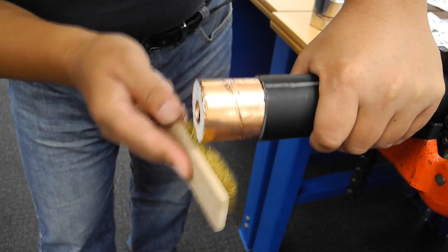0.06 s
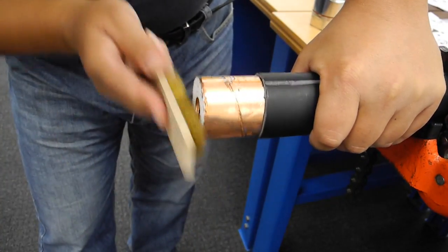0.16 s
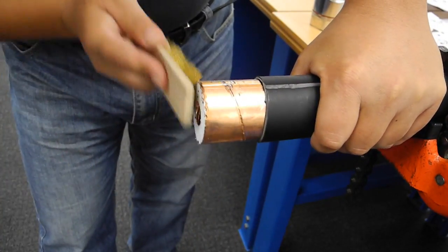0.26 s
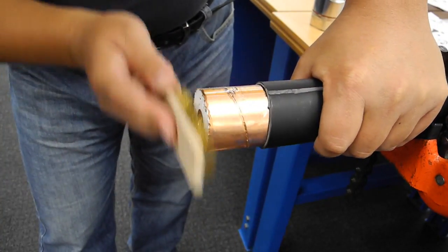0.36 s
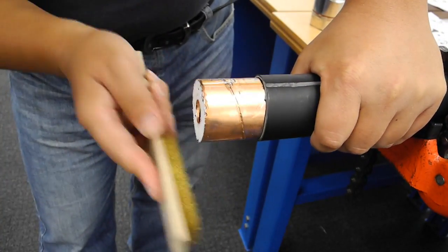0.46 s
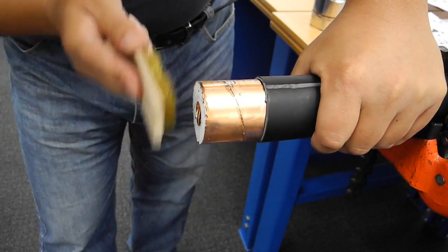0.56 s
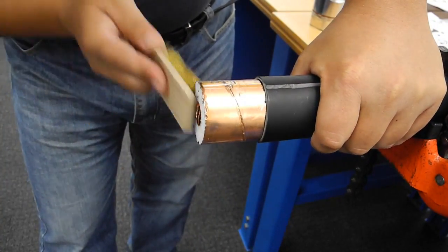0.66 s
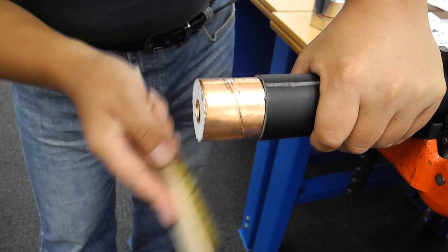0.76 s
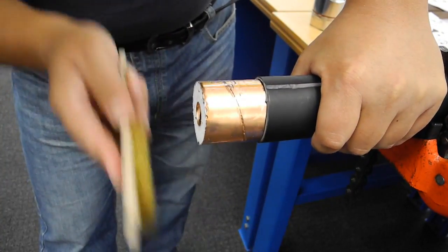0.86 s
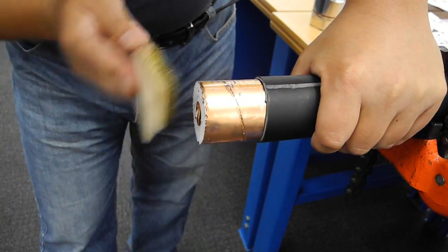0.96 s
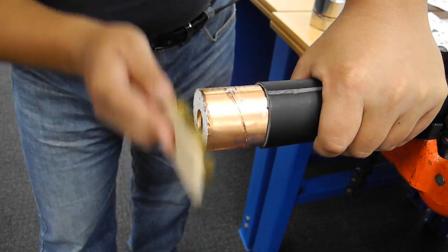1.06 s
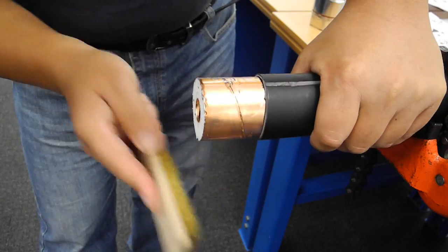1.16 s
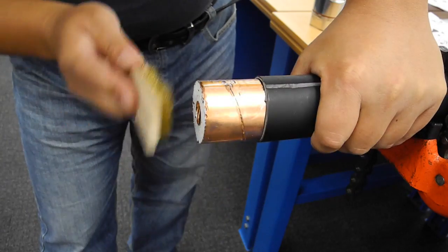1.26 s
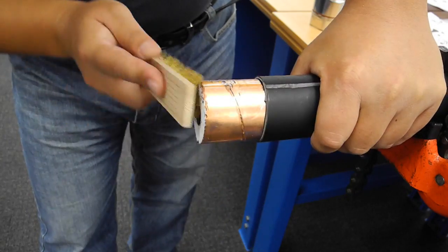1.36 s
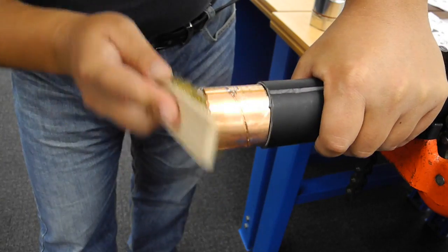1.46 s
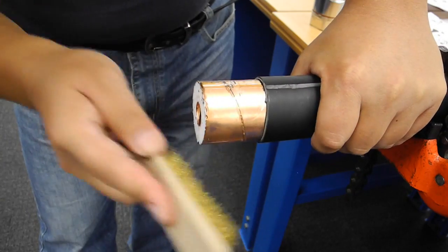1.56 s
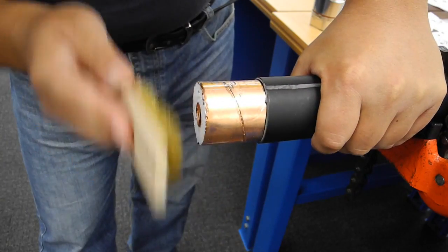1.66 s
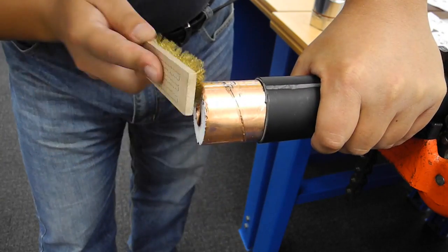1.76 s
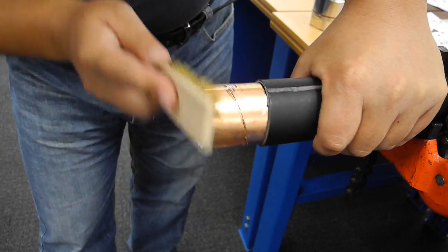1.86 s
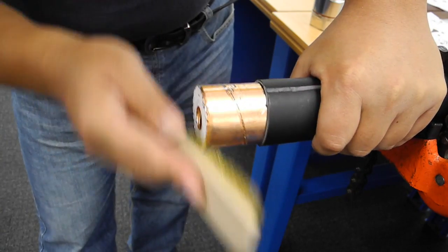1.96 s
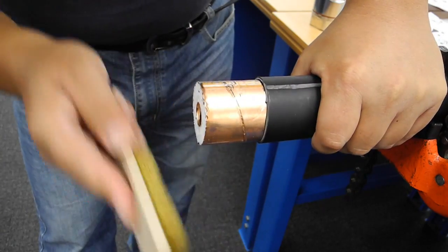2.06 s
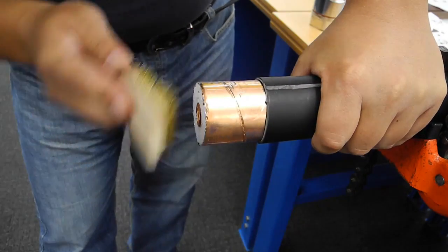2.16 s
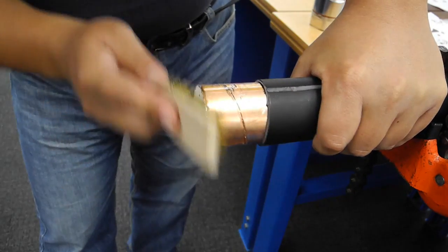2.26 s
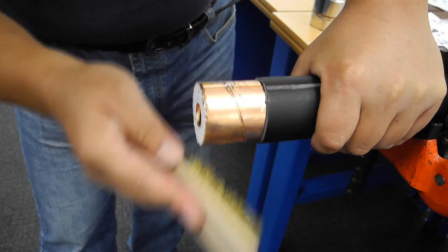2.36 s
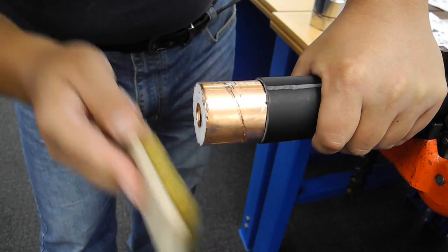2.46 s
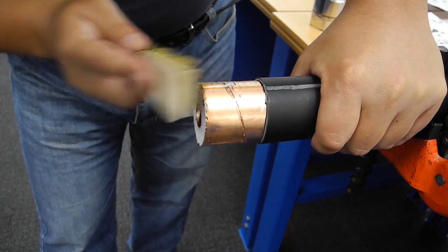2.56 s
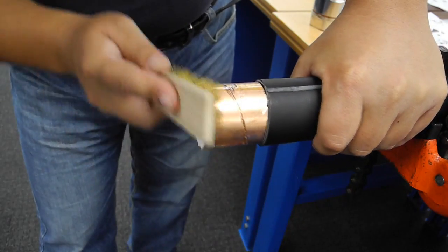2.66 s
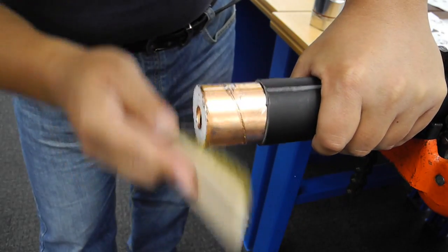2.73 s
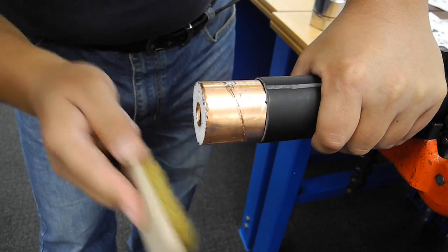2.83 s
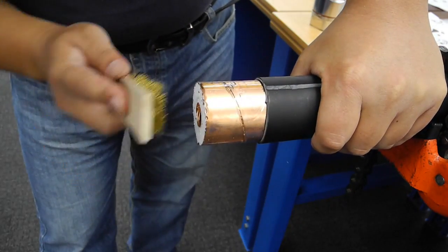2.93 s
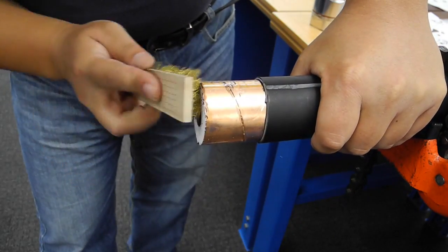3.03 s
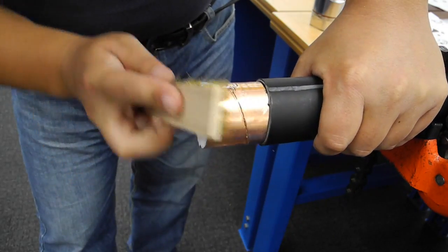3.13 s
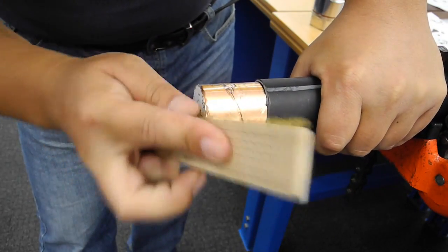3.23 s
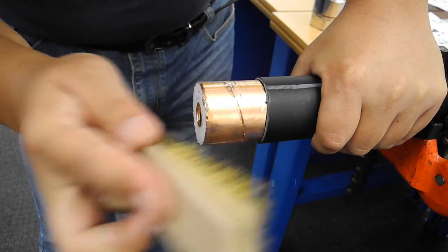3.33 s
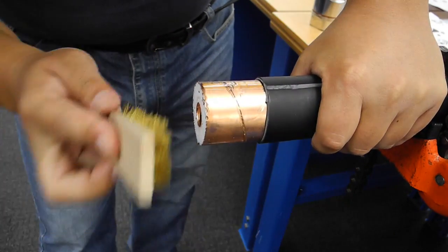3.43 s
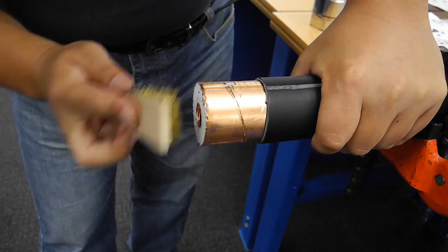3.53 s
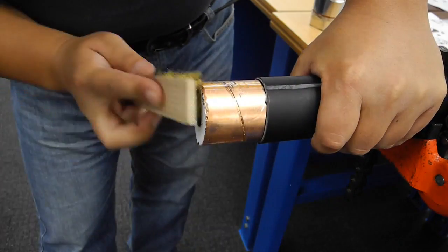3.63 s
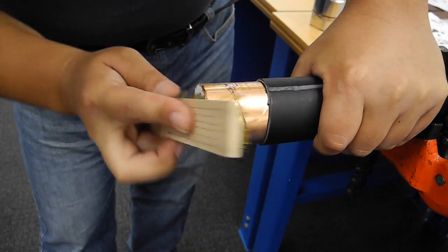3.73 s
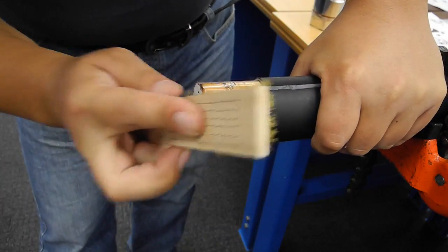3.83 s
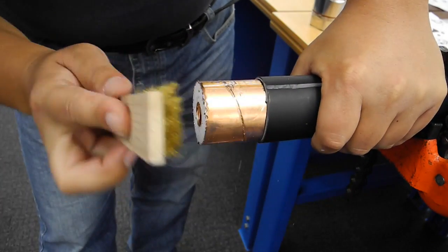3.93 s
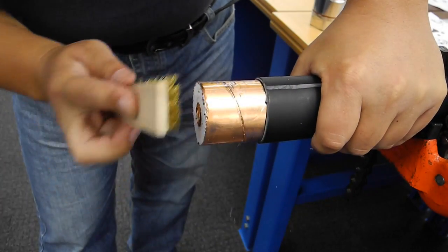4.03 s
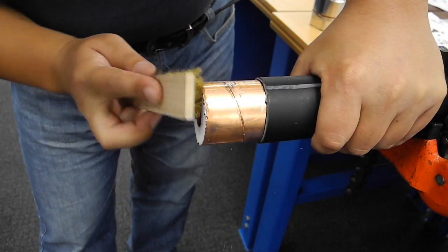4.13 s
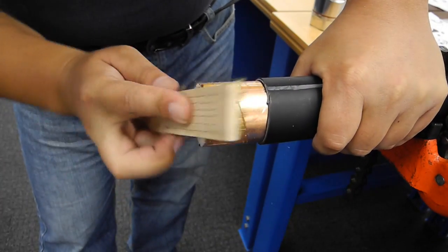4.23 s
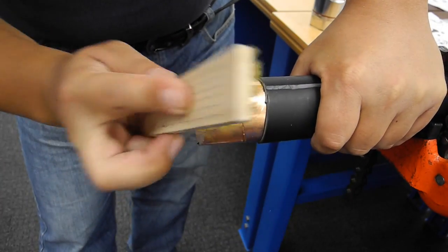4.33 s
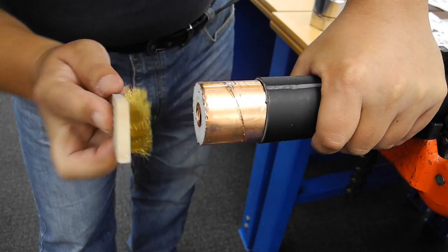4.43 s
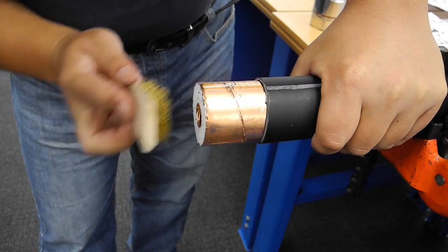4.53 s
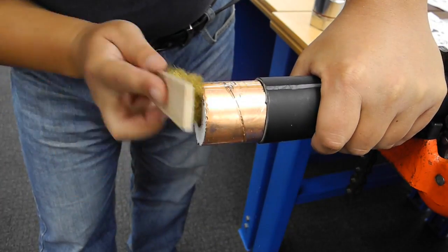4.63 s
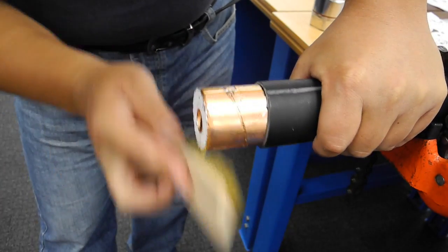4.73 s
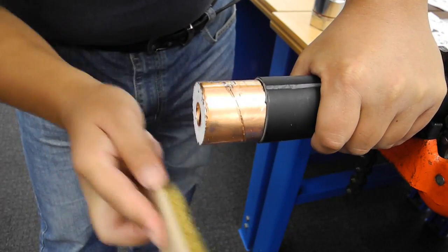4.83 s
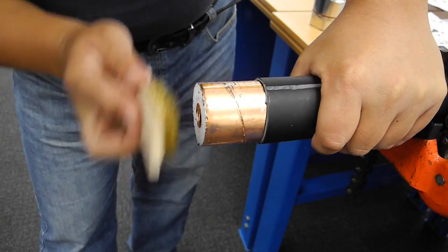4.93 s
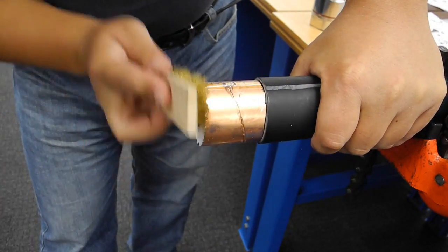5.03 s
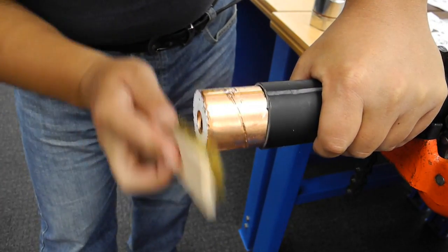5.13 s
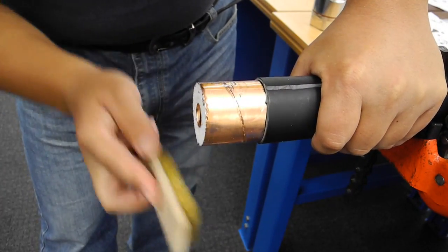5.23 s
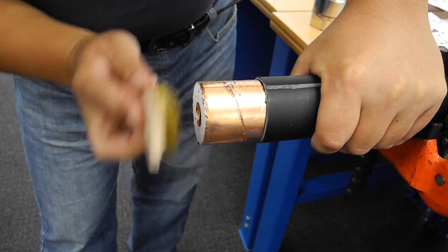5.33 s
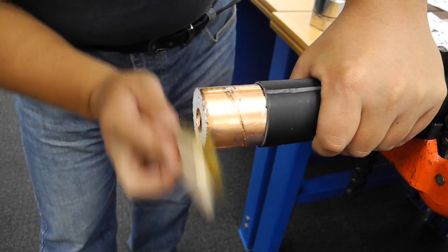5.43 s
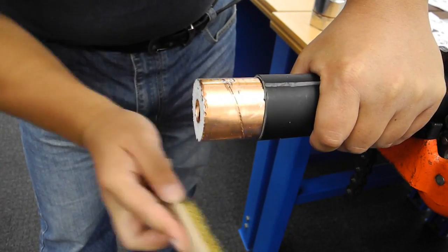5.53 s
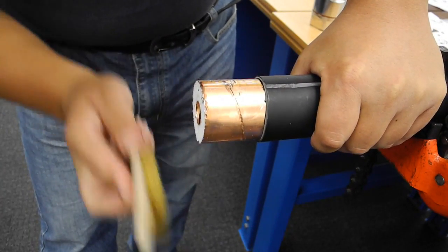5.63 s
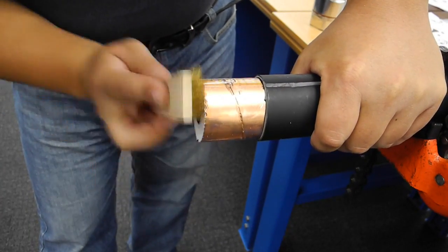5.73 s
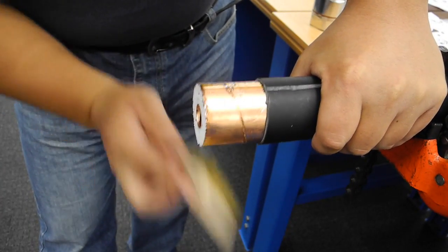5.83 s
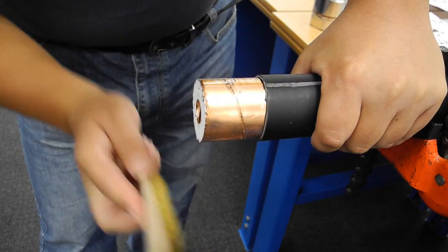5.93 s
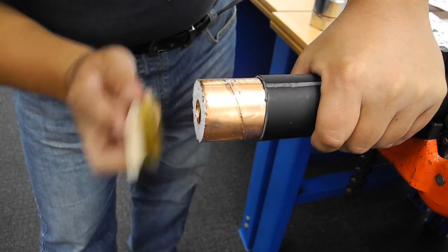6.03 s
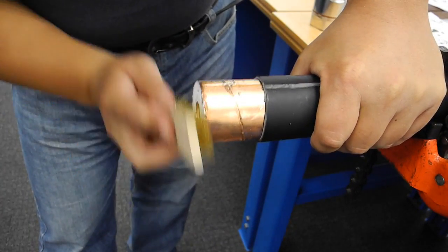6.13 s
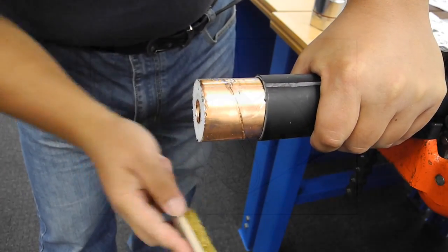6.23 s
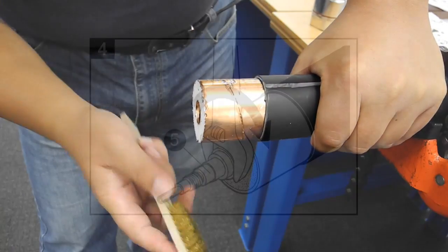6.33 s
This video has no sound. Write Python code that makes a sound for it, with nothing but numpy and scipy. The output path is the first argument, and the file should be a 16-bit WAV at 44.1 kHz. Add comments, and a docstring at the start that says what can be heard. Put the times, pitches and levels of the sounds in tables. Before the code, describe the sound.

Dry, scratchy wire bristles brush over copper in short repeated strokes, each a crisp tick followed by a hissing scrape with a slight metallic ring. The rhythm is quick and a little uneven, with longer rubs in the middle and firmer, shorter hits with soft low cable knocks near the end. Heard very close in stereo, with a short diffuse room tail and a quiet, steady low ventilation drone.

```python
"""A brass wire brush swipes the cut copper end of a thick cable, heard close up and in stereo in a workshop.
Random slips of the bristle tips ring filters for the bristles, the copper sheath and the cable in the hand.
Strokes swell, drag to the edge and lift off; landings, bounces and ticks add short crunches and knocks.
The room answers with a short diffuse tail of decaying noise.
Filtered noise and a sine make a low ventilation rumble, two drones, a motor hum and a faint hiss."""
import sys
import numpy as np
from scipy import signal
from scipy.fft import rfft, irfft
from scipy.io import wavfile
from scipy.ndimage import uniform_filter1d

SR = 44100
rng = np.random.default_rng(int(sys.argv[2]) if len(sys.argv) > 2 else 0)


def log_audio(samples):
    """Write samples as a 16-bit WAV file to the path given in sys.argv[1]."""
    # one column per channel
    frames = np.atleast_2d(samples).T
    # limit to full scale, then quantise
    limited = np.clip(frames, -1, 1)
    pcm = np.round(limited * 32767).astype(np.int16)
    wavfile.write(sys.argv[1], SR, pcm)


N = 281793  # length in samples


def undb(db):
    """Turn decibels into an amplitude factor."""
    return 10 ** (np.asarray(db) / 20)


def unit(x):
    """Scale to rms 1."""
    return x / np.sqrt(np.mean(x ** 2))


def rms_gain(response):
    """Root mean square gain over all frequency bins."""
    return np.sqrt(np.mean(abs(response) ** 2))


def bins():
    """Frequency of every bin in Hz."""
    return np.fft.rfftfreq(N, 1 / SR)


def along(table):
    """Read a curve of frequency points at every bin, on a log frequency scale."""
    hz, value = np.transpose(table)
    return np.interp(np.log(bins() + 1), np.log(hz), value)


def shape(x, gain):
    """Filter by a gain for every frequency bin."""
    return irfft(rfft(x) * gain, N)


def resonances(table):
    """Response of a sum of damped modes, each a row of pitch_hz, width_hz, level_db."""
    f = bins()
    response = 0
    for hz, width, db in table:
        damping = 1j * f * width
        response = response + undb(db) * damping / (hz ** 2 - f ** 2 + damping)
    return response


def ports(common, left, right, likeness):
    """Two channels from a shared and two private signals, mixed band by band."""
    shared = np.clip(along(likeness), 0, 1)
    middle = shape(common, np.sqrt(shared))
    return np.array([middle + shape(own, np.sqrt(1 - shared)) for own in (left, right)])


def walk(rate):
    """Random levels, new at this rate per second, slewed from one to the next; spread near 1."""
    hold = int(SR / rate)
    return uniform_filter1d(np.repeat(rng.standard_normal(N // 20), hold)[:N], hold)


SLIPS_PER_S, SLIP_SPREAD_DB = 9200, 2.5


def slips():
    """Bristle tips catch and let go at random moments, a few harder than the rest."""
    moment, force, way = rng.random((3, N))
    size_db = np.minimum(-SLIP_SPREAD_DB * np.log(1 - force), 9)
    size = undb(size_db) * np.sign(way - .5)
    happens = np.clip((SLIPS_PER_S / SR - moment) * 20, 0, 1)
    return unit(size * happens)


SWELL_BEND, LIFT_BEND = 1.64, 1.24  # the swell slows towards full level, the lift speeds up
LIFT_DB = -30.5  # change of scrape level by the end of the lift
# share of the level's drop that ring and hiss are spared (a negative share drops further)
RING_SWELL_KEEP, RING_LIFT_KEEP = 0.058, 0.18
HISS_SWELL_KEEP, HISS_LIFT_KEEP = 0.13, -.1
HISS_CLIMB_DB = 2  # the hiss brightens from full level to the edge
FADE_S = .005  # the tips come and go this quickly at both ends of a stroke
RUB_KNOCK_DB = -36  # cable shudder under the rub, relative to the scrape


def stroke(t, start, swell, drag, lift, touch_db, full_db, edge_db, ring_db, hiss_db):
    """Gains of scrape, ring, hiss and shudder as one swipe swells, drags to the edge and lifts off."""
    edge = start + swell + drag
    end = edge + lift
    unswelled = np.clip(1 - (t - start) / swell, 0, 1)
    dragged = np.clip((t - start - swell) / drag, 0, 1)
    lifted = np.clip((t - edge) / lift, 0, 1)
    lack_db = (full_db - touch_db) * unswelled ** SWELL_BEND
    gone_db = -LIFT_DB * lifted ** LIFT_BEND
    scrape_db = full_db + (edge_db - full_db) * dragged - lack_db - gone_db
    ring = ring_db + RING_SWELL_KEEP * lack_db + RING_LIFT_KEEP * gone_db
    hiss = hiss_db + HISS_CLIMB_DB * dragged
    hiss = hiss + HISS_SWELL_KEEP * lack_db + HISS_LIFT_KEEP * gone_db
    touch = np.interp(t, [start - FADE_S, start, end, end + FADE_S], [0, 1, 1, 0])
    return touch * undb(scrape_db + np.array([0 * t, ring, hiss, RUB_KNOCK_DB + 0 * t]))


# swipes of the brush, levels before the flicker; ring and hiss are relative to the scrape
# start_s, swell_s, drag_s, lift_s, touch_db, full_db, edge_db, ring_db, hiss_db
SWIPES = [ (-0.01, 0.026, .02, 0.016, -52, -49.5, -51, -11.5, 2.5),
          (0.035, 0.049, 0.033, .045, -56.5, -33, -37, -12, -3),
          (0.14, .055, 0.039, .035, -60, -36.5, -35, -11, -1.5),
          (0.315, 0.063, 0.077, 0.046, -54, -33.5, -29.5, -14.5, -3),
          (0.698, 0.066, 0.04, 0.025, -57.5, -33, -32.5, -14, -4),
          (1.05, .07, 0.036, 0.029, -51, -30.5, -29.5, -16, -3.5),
          (1.41, 0.12, 0.043, 0.043, -53, -31.5, -33, -12, -3.5),
          (1.824, 0.0092, .012, 0.018, -52, -44.5, -48, -13, -3),
          (1.862, 0.094, 0.054, 0.03, -52.5, -30.5, -31, -13, -4),
          (2.275, 0.071, .057, 0.031, -61, -31.5, -33, -15.5, -6),
          (2.658, 0.091, 0.046, 0.038, -53, -32, -32.5, -11.5, -4.5),
          (3.035, .015, .02, .015, -72, -68, -65, -4, -4),
          (3.078, 0.12, 0.099, .016, -57, -30.5, -35, -11, -5.5),
          (3.662, 0.091, 0.1, 0.036, -52, -32, -34, -11, -5.5),
          (4.172, 0.089, 0.077, 0.019, -54, -32, -36.5, -11.5, -4.5),
          (4.7, 0.078, 0.046, 0.051, -53.5, -32, -30.5, -12.5, -2.5),
          (5.104, 0.083, 0.027, 0.041, -48.5, -33.5, -29.5, -12.5, -2.5),
          (5.47, 0.024, 0.06, 0.018, -42, -34.5, -31, -15.5, -4),
          (5.838, 0.031, .038, 0.023, -42, -34.5, -29, -15, -2.5),
          (6.182, .03, .02, 0.02, -38, -31.5, -28.5, -16.5, -5), ]
ROW_RATE, ROW_DB = 120, -0.18  # flicker steps per second, depth in dB
PATCHY_RATE, PATCHY_DB = 60, 1


def strokes():
    """Gains over time of scrape, ring, hiss, shudder and (empty here) push, with the flicker of all swipes."""
    t, gain = np.arange(N) / SR, np.zeros((5, N))
    for row in SWIPES:
        near = slice(max(int((row[0] - .05) * SR), 0), int((row[0] + .4) * SR))
        gain[:4, near] += stroke(t[near], *row)
    gain *= undb(ROW_DB * walk(ROW_RATE))  # rows of tufts cross the edge unevenly
    # each part of the sound flickers alone
    return gain * undb(PATCHY_DB * np.array([walk(PATCHY_RATE) for _ in gain]))


# the brush lands, bounces or ticks; ring is relative to the crunch, knock is the cable's blow
# start_s, crunch_peak_db, length_s, ring_db, knock_db
TOUCHDOWNS = [(0.6913, -25, 0.0067, -18, -63), (1.042, -28, 0.01, -11, -45),
              (1.3966, -28, 0.012, -12.5, -53), (1.8195, -24, 0.003, -30, -57),
              (2.266, -28.5, 0.0065, -14, -51.5), (2.647, -21, 0.0088, -17.5, -58),
              (3.074, -37, 0.0028, -10, -58), (3.102, -32, 0.0064, -4, -61),
              (3.6352, -31, 0.0068, -7.5, -54), (3.674, -37, 0.0023, -20, -57),
              (4.143, -28.5, 0.0052, -14, -57), (4.18, -46, 0.0031, -12, -54),
              (4.6912, -24.5, 0.0055, -19, -49), (5.091, -23.5, 0.0069, -13.5, -58),
              (5.462, -22.5, 0.0051, -13.5, -43), (5.8315, -22.5, 0.0044, -7, -38),
              (6.1734, -24, 0.0064, -8, -38.5), (6.368, -47, 0.0042, -3, -61)]
CRUNCH_CREST_DB = 14.5  # taken off the peak to set the crunch gain
CRUNCH_TAIL_DB, CRUNCH_TAIL_S = -5, 0.0048  # stragglers, relative to the crunch
CRUNCH_HISS_DB = -7.5  # relative to the crunch
SHUDDER_DB, SHUDDER_S = -9.5, 0.068  # relative to the knock, decay time
PUSH_S = 0.0011  # delay and width of the push


def landings():
    """Gains of scrape, ring, hiss, shudder and push as tips touch down within milliseconds and jolt the cable."""
    t, gain = np.arange(N) / SR, np.zeros((5, N))
    for start, peak_db, length, ring_db, knock_db in TOUCHDOWNS:
        age = np.maximum(t - start + .0012, 0)
        rise = 1 - np.exp(-(age / .0013) ** 2)
        burst = np.exp(-(age / max(length, .001)) ** 4)
        stragglers = undb(CRUNCH_TAIL_DB) * np.exp(-age / CRUNCH_TAIL_S)
        crunch = rise * (burst + stragglers)
        gain[:3] += crunch * undb(peak_db - CRUNCH_CREST_DB + np.array([[0], [ring_db], [CRUNCH_HISS_DB]]))
        # the cable takes the blow and shudders on in the hand
        gain[3] += rise * undb(knock_db + SHUDDER_DB) * np.exp(-age / SHUDDER_S)
        gain[4] += undb(knock_db) * np.exp(-((t - start - PUSH_S) / PUSH_S) ** 2)
    return gain


# tone of the bristles, relative: pitch_hz, density_db (per Hz)
BRISTLE_TONE = [(1470, -26), (2500, -20), (2990, -10.5), (3460, -4.5), (3950, -2.5), (4800, -1), (8870, -4),
                (11500, -0.5), (15000, -6), (16000, -7.5)]
# rings among the bristle sound, before they are doubled: pitch_hz, width_hz, level_db
BRISTLE_PINGS = [(3454, 97, -7.5), (3580, 96, -17.5), (4350, 160, -22), (4760, 100, -19), (6330, 100, -26),
                 (11300, 180, -29.5)]
# modes of the copper sheath, relative: pitch_hz, width_hz, level_db
SHEATH_MODES = [(563, 110, -4.5), (1073, 70, -6), (1220, 290, -8.5), (1495, 330, 4), (1963, 230, -4.5),
                (2224, 160, -0.5)]
# the cable bending in the hand, relative: pitch_hz, width_hz, level_db
CABLE_MODES = [(198, 31, -6.5), (255.5, 17, 1.5), (306, 76, -9.5)]
# stereo likeness of the slips: pitch_hz, common_share (0 to 1)
SLIP_LIKENESS = [(300, 0.74), (1400, 0.71), (3100, 0.62), (6800, 0.36), (15000, 0.3)]
# stereo balance of the brush: pitch_hz, left_minus_right_db
BRUSH_LEAN = [(500, 0), (1400, -2.5), (2800, 0.2), (5600, -0.7), (10000, 2.5), (14000, 0)]
HISS_SPLIT_HZ = 8000  # the bristle sound is scrape below, hiss above
PUSH_DB = 13.5
SPOT_RATE, SPOT_DB = 12, 2.5  # wander steps per second, depth in dB


def brush():
    """The slips ring the bristles, the copper sheath and the cable held in the hand."""
    tips = ports(slips(), slips(), slips(), SLIP_LIKENESS)
    scrape, ring, hiss, shudder, push = strokes() + landings()
    above_split = 1 / (1 + (HISS_SPLIT_HZ / (bins() + 1)) ** 6)
    wire = undb(along(BRISTLE_TONE)) * (1 + 2 * resonances(BRISTLE_PINGS))
    cable = resonances(CABLE_MODES)
    near = shape(push, undb(PUSH_DB) * cable)  # one firm push sets the cable bending
    for gain, body in ((scrape, wire * (1 - above_split)), (hiss, wire * above_split), (shudder, cable)):
        near = near + shape(tips * gain, body / rms_gain(body))
    rubbed = tips * ring / rms_gain(resonances(SHEATH_MODES))
    for mode in SHEATH_MODES:
        # the rubbed spot wanders, so each mode is driven more or less
        drive = undb(SPOT_DB * walk(SPOT_RATE))
        near = near + shape(rubbed * drive, resonances([mode]))
    return shape(near, undb(along(BRUSH_LEAN) * np.array([[.5], [-.5]])))


# reverberation bands, levels before the bands overlap: pitch_hz, t60_s, level_db
TAIL_BANDS = [(500, 0.37, -9.5), (1400, 0.55, -16), (2430, 0.33, -12.5), (4660, 0.44, -21.5),
              (7600, 0.31, -20.5), (13000, 0.43, -26)]


def room(near):
    """A diffuse tail of noise decaying band by band, different in each channel."""
    t, f, tail = np.arange(N) / SR, bins() + 1, 0
    for hz, t60, db in TAIL_BANDS:
        decay = rng.standard_normal((2, N)) * 1000. ** (-t / t60) * (t > .004)
        decay /= np.sqrt(np.sum(decay ** 2, axis=1, keepdims=True))
        band = np.exp(-3 * np.log2(f / hz) ** 2)
        tail = tail + undb(db) * rfft(decay) * band
    return irfft(rfft(near.mean(axis=0)) * tail, N)


# tone of the ventilation, relative: pitch_hz, density_db (per Hz)
AIR_TONE = [(18, -47), (30, -5), (86, 0.5), (176, -3), (235, -2.5), (323, -12.5), (409, -13.5), (493, -13),
            (641, -21.5), (1340, -27.5), (2740, -33.5), (6050, -33), (11100, -38.5), (15200, -42),
            (16500, -60)]
# stereo likeness of the ventilation: pitch_hz, common_share (0 to 1)
AIR_LIKENESS = [(60, 0.94), (300, 0.82), (640, 0.61), (1400, 0.032), (3000, 0.)]
# room resonances in the rumble, rms before the stereo lean: pitch_hz, width_hz, level_db
RUMBLE_DRONES = [(68.4, 11, -62.5), (135.6, 4.3, -61)]
AIR_DB = -54.5  # rms before the stereo lean
HUM_HZ, HUM_DB = 233.1, -59  # rms around which the hum wanders slightly


def shop():
    """Noise through ventilation and drone filters makes rumble and faint hiss; a sine makes the motor hum."""
    noise = ports(*rng.standard_normal((3, N)), AIR_LIKENESS)
    rumble = undb(AIR_DB) * unit(shape(noise, undb(along(AIR_TONE))))
    for hz, width, db in RUMBLE_DRONES:
        drone = shape(rng.standard_normal(N), resonances([(hz, width, 0)]))
        rumble = rumble + undb(db) * unit(drone)
    hum = unit(np.sin(2 * np.pi * HUM_HZ * np.arange(N) / SR))
    hum = hum * undb(HUM_DB + 0.37 * walk(6.4))
    return rumble * undb([[-.4], [.4]]) + hum  # the rumble leans right


def scene():
    """Brush, its tail and the workshop."""
    near = brush()
    return near + room(near) + shop()


def record(dry):
    """A steep elliptic low-pass cuts the top of the treble above 15.7 kHz."""
    low_pass = signal.ellip(10, .2, 70, 15700, fs=SR, output="sos")
    return signal.sosfilt(low_pass, dry)


dry = scene()
out = record(dry)
log_audio(out)
```